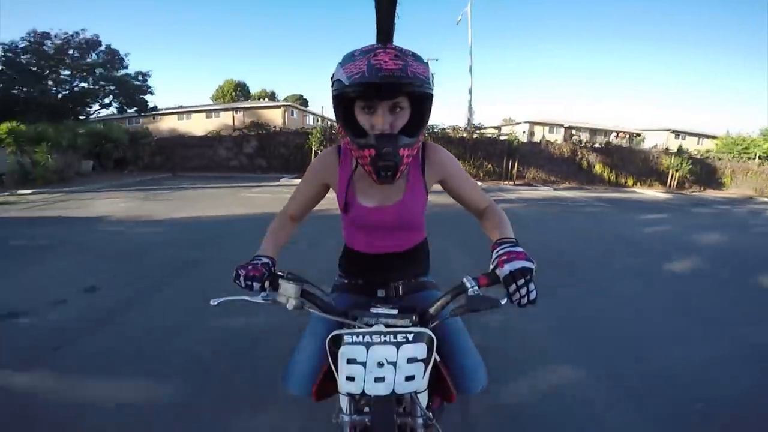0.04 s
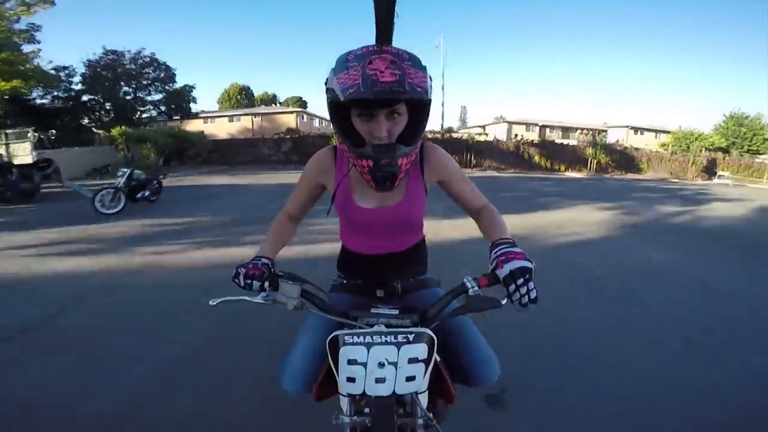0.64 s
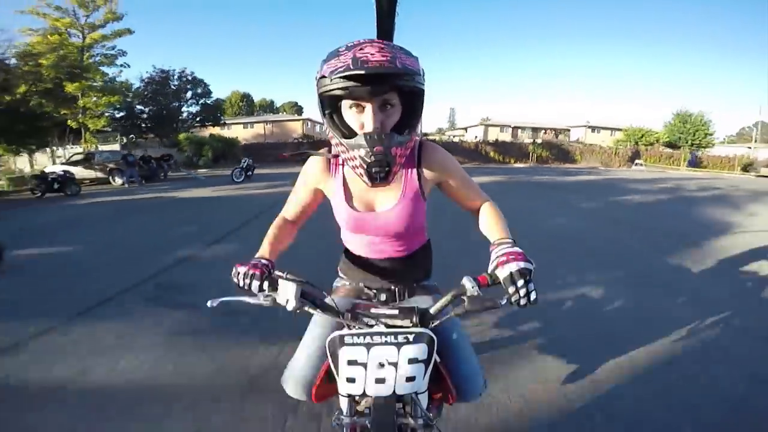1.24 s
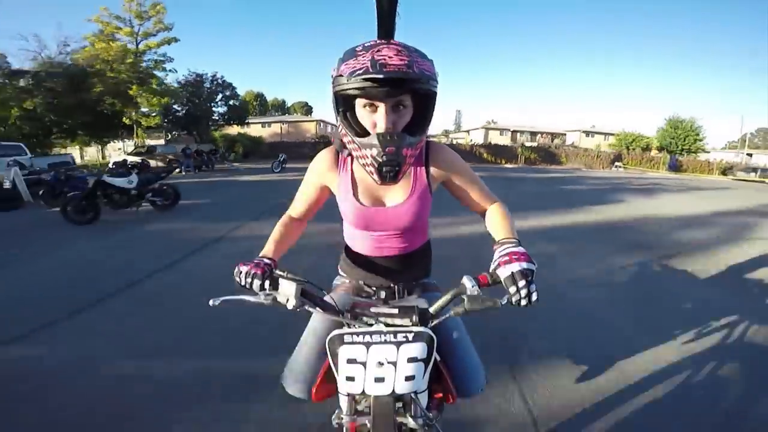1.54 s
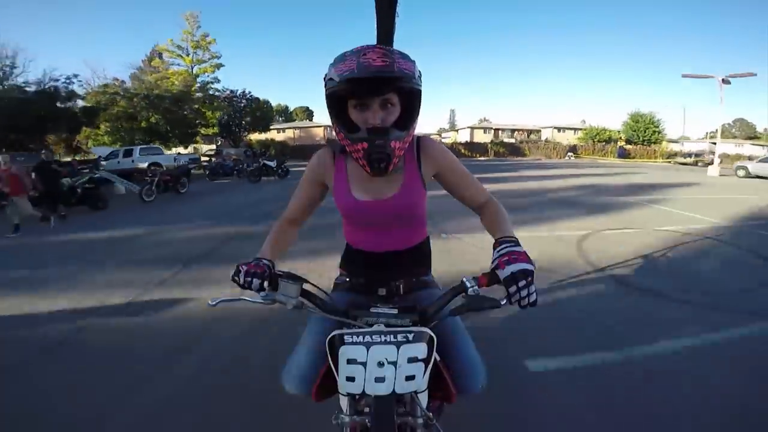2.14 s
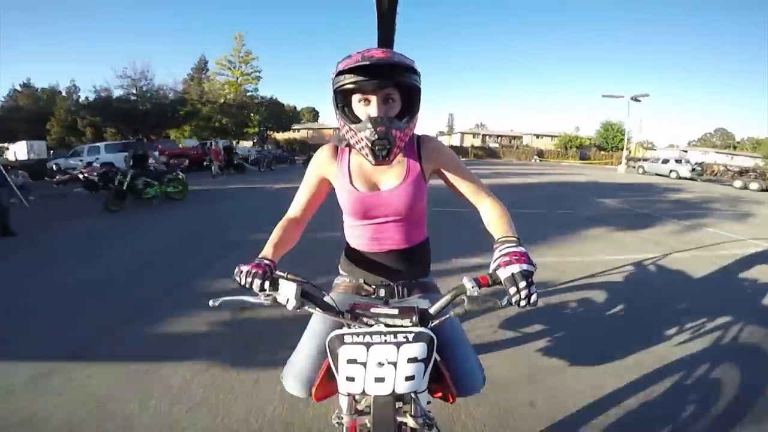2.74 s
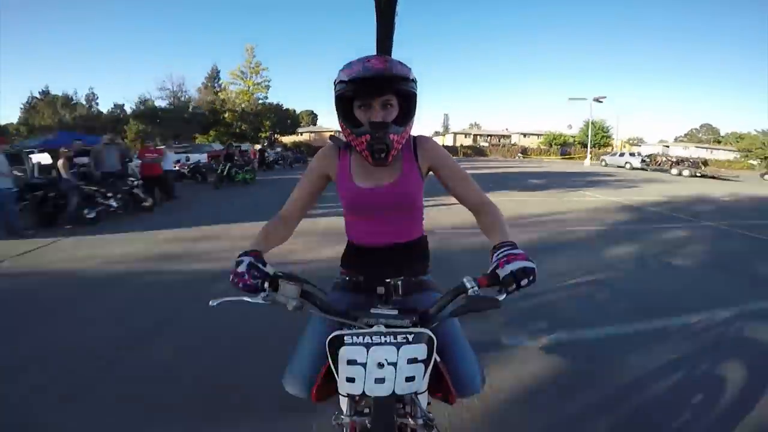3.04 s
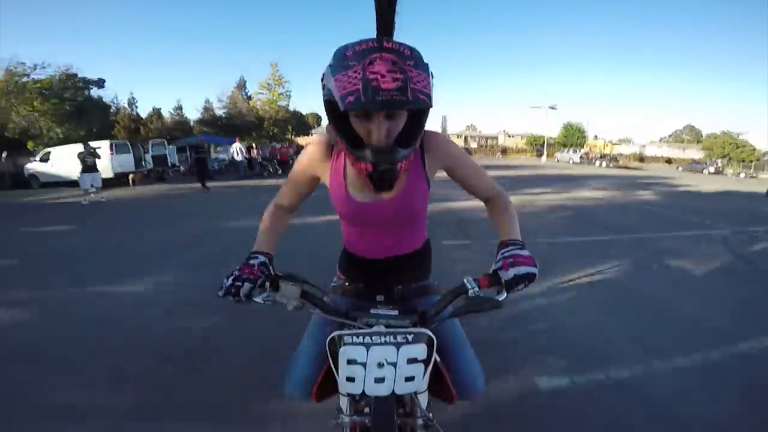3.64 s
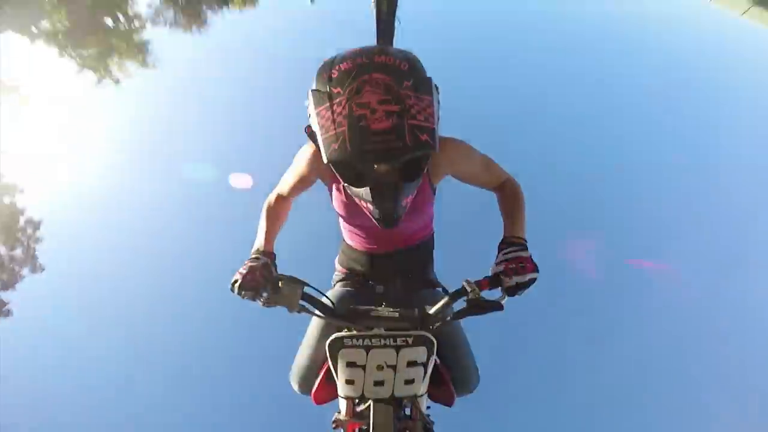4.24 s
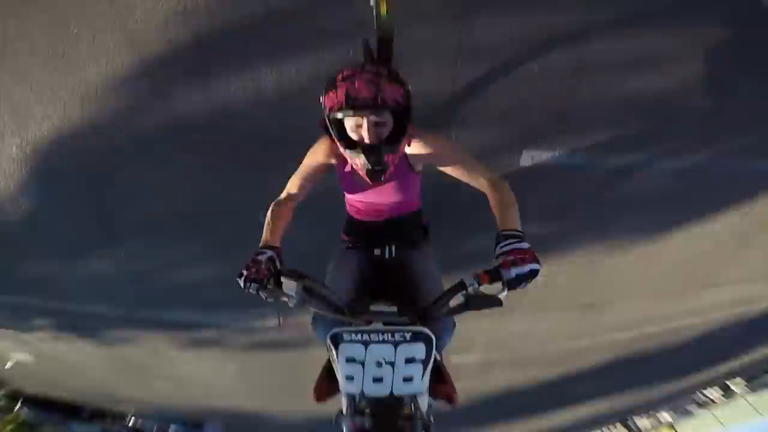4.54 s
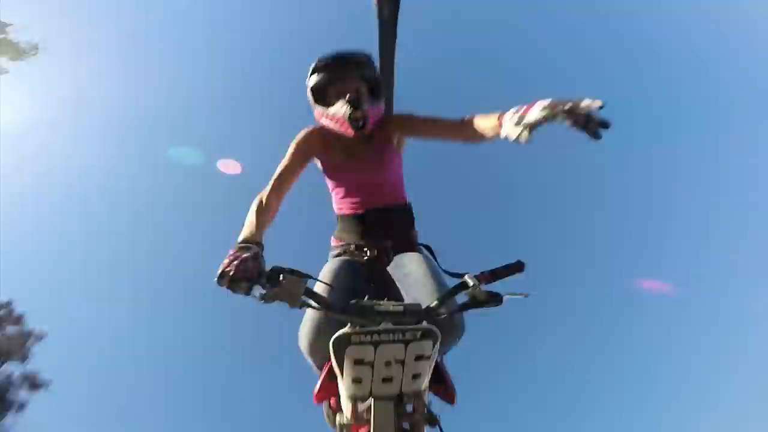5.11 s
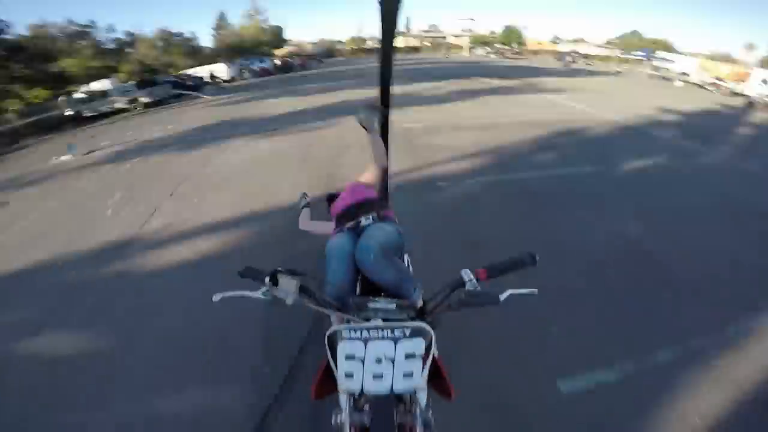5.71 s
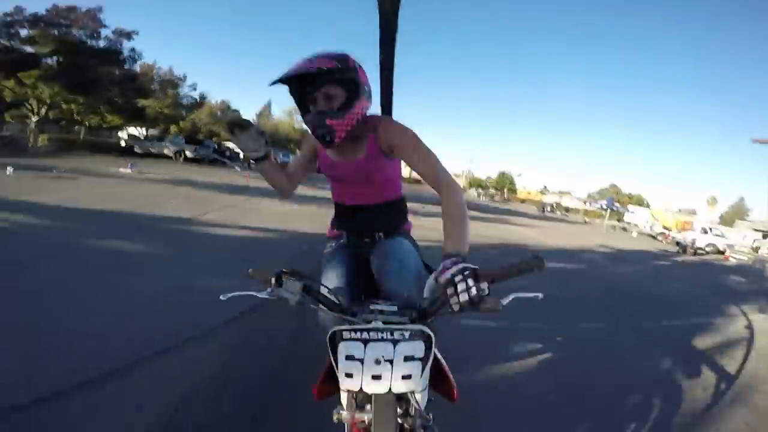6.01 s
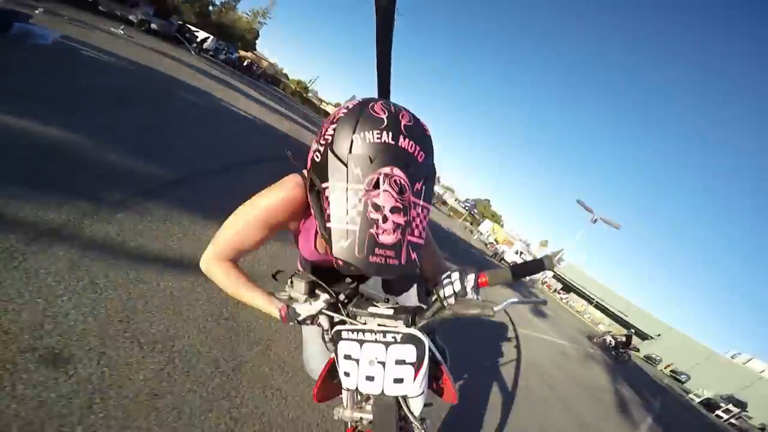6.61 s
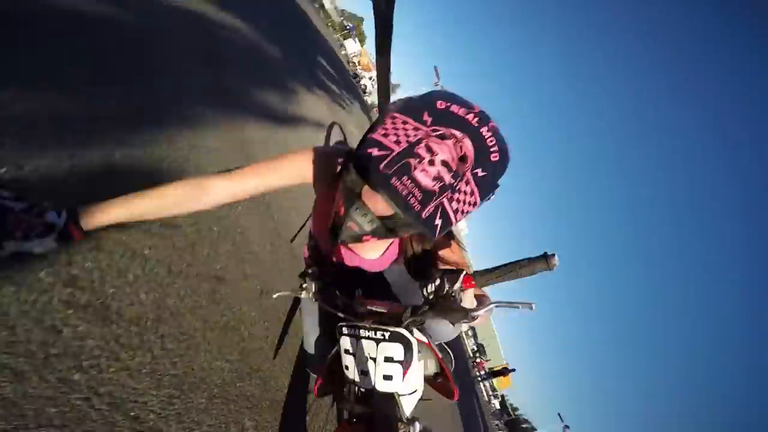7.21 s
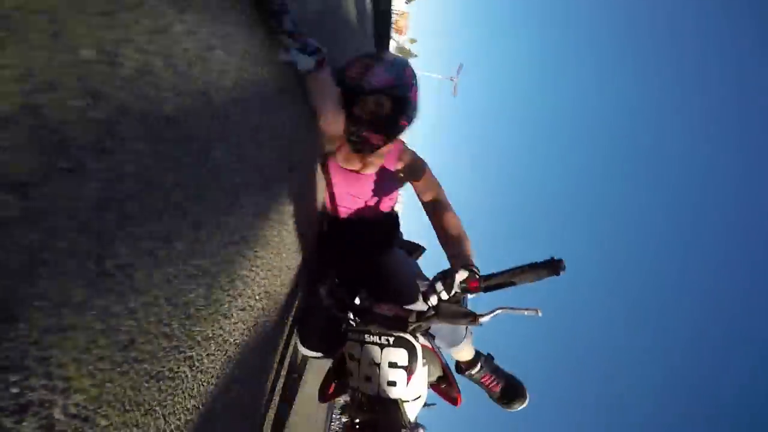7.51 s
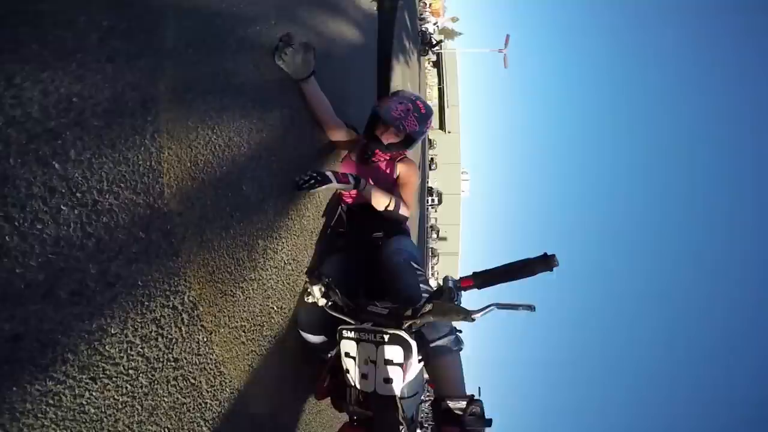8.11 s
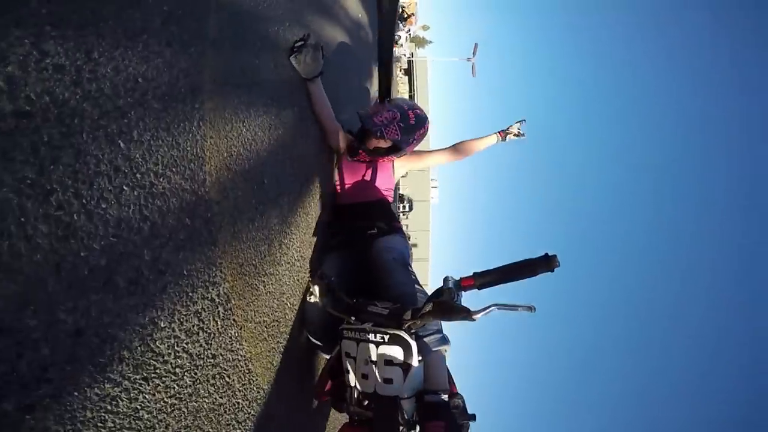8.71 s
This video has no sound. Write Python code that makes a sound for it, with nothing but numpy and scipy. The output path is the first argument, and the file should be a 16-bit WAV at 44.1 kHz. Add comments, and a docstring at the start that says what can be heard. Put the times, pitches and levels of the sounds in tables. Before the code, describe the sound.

A small dirt bike engine revs hard, then the bike tumbles over asphalt with cracks and clanks, scrapes along and idles.

```python
"""A small four-stroke dirt bike revs hard, heard from a camera on a pole bolted to its frame.
The throttle shuts; the bike flips and bounces over the asphalt in cracks, thuds and clanks of
loose metal, and each landing sets the pole swinging. It rolls on slowly, scrapes down on its
footpeg and handlebar, and idles. The engine is firing strokes and rattling parts over a road
rumble. Nearly all the sound comes up the pole and rings in the camera housing."""
import sys
import numpy as np
from scipy import signal
from scipy.fft import rfft, irfft, next_fast_len
from scipy.io import wavfile
from scipy.ndimage import uniform_filter1d, minimum_filter1d

SR = 44100
rng = np.random.default_rng(int(sys.argv[2]) if len(sys.argv) > 2 else 0)


def to_wav(s):
    """Save 16-bit WAV."""
    ch = np.atleast_2d(s).T  # columns
    pcm = np.round(np.clip(ch, -1, 1) * 32767)  # PCM
    wavfile.write(sys.argv[1], SR, pcm.astype(np.int16))


N = 394694
TIME = np.arange(N) / SR
HZ = np.fft.rfftfreq(8192, 1 / SR)

# The bike lands on the asphalt:
# start_s, crack_db, thud_relative_db, rebound_db, settle_s, swing_db, swing_hz, swing_t60_s
LANDINGS = [(4.4588, 8.5, -5.5, -13, 0.046, -7.5, 42.4, 0.3),
            (4.6312, -2, 0.5, -13.5, 0.083, -2, 40.65, 0.42),
            (5.046, 3, -1.5, -4, 0.072, -6.5, 41.25, 0.77), (5.524, 5, -2.5, -9, 0.12, -6, 39.86, 1),
            (5.921, -21, 10, -18.5, 0.072, -3.5, 38.3, 0.43), (7.657, -7, 4, -10, 0.023, -3, 69.26, 0.2)]
# Tone of a hard contact: frequency_hz, gain_db
CRACK_TONE = [(600, 10), (1200, 8), (2300, 9), (3500, -2.5), (4800, -9.5), (7500, -15.5), (12500, -29),
              (15000, -30)]
# Tone of a blow through the frame: frequency_hz, gain_db
THUD_TONE = [(47, -32), (80, 6.5), (136, -12), (233, -8), (413, -9.5), (762, -14), (1010, -13.5),
             (1350, -25), (1800, -27), (2340, -71), (3960, -120)]
# Tone of grit on the housing: frequency_hz, gain_db
GRIT_TONE = [(2500, -24), (5000, 7.5), (7000, -3.5), (9000, -6.5), (11000, 0), (13500, -2.5), (15000, -18)]

COASTING = np.clip((TIME - LANDINGS[0][0]) / 0.029 + .5, 0, 1)  # 0 under way, 1 after the first landing


def engine():
    """Firing strokes and loose parts ring through the housing as exhaust, whine and clatter."""
    # The throttle opens, eases, opens wide and shuts, with one blip in the tumble: time_s, turns_per_s
    crank_speed = [(0, 126), (.17, 118.6), (.5, 136), (.62, 135), (.77, 120.3), (.93, 110.5), (1.07, 120.4),
                   (1.37, 124.4), (1.97, 133.6), (2.42, 148), (3.05, 159.5), (3.17, 159), (3.5, 138.6),
                   (3.77, 124), (4.22, 90), (4.45, 90), (4.7, 46), (5.2, 45.5), (5.52, 69.4), (6.05, 43),
                   (6.95, 52.2), (8.35, 38.8), (8.95, 48)]
    # How loosely the engine rattles: time_s, roughness (0-1)
    looseness = [(0, 0.33), (1.6, 0.36), (2.4, 0.43), (3.1, 0.47), (3.45, 0.23), (3.85, 0.69), (4.5, 0.88),
                 (8.9, 0.86)]
    speed, rough = curves(crank_speed) + curves(looseness)
    exhaust_db, clatter_db = engine_levels(speed)
    angle = 2 * np.pi * np.cumsum(speed * (1 + 0.00715 * rough * drift(23.76))) / SR
    shake = crank_shake(angle)
    firing, singing = map(housing, firing_strokes(angle))
    rattle = housing(engine_rattle(angle))

    def blend(rattle_share, lo_hz, hi_hz):
        """Mixes firing and rattle, each levelled by its rms in a band; singing orders ride on top."""
        tone = (firing + singing) / running_rms(band(firing, lo_hz, hi_hz), size=14000)
        noise = rattle / running_rms(band(rattle, lo_hz, hi_hz))
        return np.sqrt(1 - rattle_share) * tone + np.sqrt(rattle_share) * noise

    exhaust = amp(exhaust_db) * band(blend(rough ** 2, 330, 900), 130, 860, order=4)
    whine = amp(clatter_db - 2 - 1.94 * COASTING) * band(blend(rough, 900, 1081), 803, 1600, order=4)
    clatter = amp(clatter_db + .5) * band(blend(np.sqrt(rough), 1900, 3400), 1710, 12000, order=4)
    fizz = signal.sosfiltfilt(signal.butter(4, 6600, "high", fs=SR, output="sos"), clatter)
    clatter -= COASTING * (1 - amp(-1.5)) * fizz  # a slow engine rattles with less fizz
    low_end = shake + pole_drone(angle) + road_rumble(angle)
    return exhaust + whine + clatter + low_end + idle_puffs(angle, exhaust_db)


def engine_levels(speed, cruise_turns_per_s=126):
    """Exhaust and clatter levels in dB: under way they climb with the revs, then they drop to idle."""
    # The idle, louder as the bike leans over: time_s, exhaust_db, clatter_db
    idle_levels = [(4.5, -48, -43.5), (5.35, -48, -45.5), (6.4, -46, -40), (7.3, -42, -32.5),
                   (8.25, -42.5, -40), (8.95, -40, -32)]
    idle_exhaust_db, idle_clatter_db = curves(idle_levels)
    revs = speed - cruise_turns_per_s
    surge_db = 0.22 * drift(5)  # the load wavers
    exhaust_db = (1 - COASTING) * (-29 + 0.1659 * revs) + COASTING * idle_exhaust_db
    clatter_db = (1 - COASTING) * (-27.5 + 0.2045 * revs) + COASTING * idle_clatter_db
    return exhaust_db + surge_db, clatter_db + surge_db


def firing_strokes(angle):
    """Firing every second turn gives whole and weaker half orders; returns the buzz and singing orders."""
    # Orders that stand out or sink: crank_multiple, gain_db
    voicing = [(2, -1), (2.5, 0), (3, -1), (3.5, 9), (4, 0.5), (4.5, 7.5), (5, -3), (6, -3), (7, -4),
               (8, -7), (9, -2), (10, -3)]
    # Orders that sing as they sweep through a frame resonance:
    # centre_s, half_length_s, crank_multiple, gain_db
    swells = [(3.45, 0.44, 2, 3.5), (3.1, 0.2, 4, -10), (3.32, 0.087, 7, 6), (3.49, .11, 8, 11.5)]
    half_order = np.arange(2049)
    orders = (half_order > 2) * amp(-7 * (half_order % 2)) / (1 + (half_order / 60) ** 2)
    for multiple, db in voicing:
        orders[round(2 * multiple)] *= amp(db)
    orders = orders * np.exp(2j * np.pi * rng.random(len(orders)))

    def looped(partials):
        """One two-turn cycle, repeated at the speed of the crank."""
        cycle = irfft(partials)
        return np.interp(angle / (4 * np.pi) % 1, np.linspace(0, 1, len(cycle)), cycle)

    singing = np.zeros(N)
    for centre_s, half_length_s, multiple, db in swells:
        swell = amp(db) * np.exp(-((TIME - centre_s) / half_length_s) ** 4)
        singing += swell * looped(orders * (half_order == 2 * multiple))
    waver = sum(drift(2.1) * looped(orders * rng.standard_normal(len(orders))) for _ in range(2))
    return looped(orders) + 0.62 * waver, singing


def engine_rattle(angle):
    """Loose parts rattle hardest once a turn, and no two turns are alike."""
    knocks = .5 + 0.18 * COASTING + np.exp(-(angle / (2 * np.pi) % 1) / 1.1)
    flicker = amp(2 * drift(150) + 0.84 * drift(10))
    return unit(knocks * flicker * rng.standard_normal(N))


def crank_shake(angle):
    """The crank shakes the pole once a turn: a deep hum with a faint octave below."""
    # Strength of the shake: time_s, level_db
    shake_levels = [(0, -10.5), (.41, -8.5), (.48, -20.5), (.66, -7.5), (.98, -20.5), (1.1, -11),
                    (1.78, -8.5), (2.45, -22.5), (3.33, -14), (3.5, -7.5), (3.82, -10.5), (3.95, -20.5),
                    (4.44, -13.5), (4.6, -31.5), (5.5, -18), (6.1, -25), (6.7, -13), (7.4, -13),
                    (8.2, -25.5)]
    gain = np.sqrt(2) * amp(curves(shake_levels)[0] + .5 * drift(25))
    return gain * (np.sin(angle) + amp(-31.5) * np.sin(angle / 2))


def idle_puffs(angle, exhaust_db, decay_cycles=0.099):
    """At idle the firing strokes stand apart: one soft puff every second turn."""
    stroke = np.exp(-(angle / (4 * np.pi) % 1) / decay_cycles)
    puffs = band(stroke * (2 + rng.standard_normal(N)), 198, 400, order=2)
    return COASTING * amp(exhaust_db - 7) * unit(puffs)


def housing(x):
    """Engine vibration travels up the pole and rings in the camera housing."""
    # Path from the frame to the microphone: frequency_hz, gain_db
    frame_path = [(60, -61), (150, -11), (260, -2), (400, -8.5), (520, -19), (900, -19.5), (1300, -8.5),
                  (1800, -14), (3150, -15), (3500, -24.5), (5600, -36), (7600, -34.5), (8400, -48),
                  (11500, -42), (15000, -66.5)]
    # Resonances and notches of the housing: centre_hz, width_hz, gain_db
    modes = [(457.3, 4.6, 16), (631.2, 43, 16.5), (766.5, 200, 12), (1037, 107, 20), (1125, 88, 13.5),
             (1437, 117, -16.5), (2011, 50, 10), (2226, 346, 16), (2843, 62, 8), (3033, 34, 8),
             (4040, 64, 8), (4550, 110, 6), (5010, 5.7, 18), (5570, 110, 10.5), (5850, 160, -18.5),
             (6810, 51, 13), (7240, 320, 7.5)]
    modes_db = sum(db / (1 + (2 * (HZ - hz) / width) ** 2) for hz, width, db in modes)
    return colour(x, spectrum(frame_path) + modes_db)


def blows():
    """Each contact is a short, crunchy crack and a longer thud through the frame; the hardest snap."""
    # Bright edge of a hard blow: frequency_hz, gain_db
    snap_tone = [(2500, -18), (4200, 7.5), (6000, -5), (9500, -9), (12500, -13), (15000, -26)]
    t = np.arange(SR // 4) / SR
    cracks, thuds, snaps = np.zeros((3, N))
    for s, db, thud_db in contacts():
        crunch = burst(t, 0.13) * sparse(len(t), per_s=200)
        add(cracks, s, amp(db - 10) * (burst(t, 0.027) + amp(2) * crunch))
        add(thuds, s, amp(db + thud_db - 2) * burst(t, 0.061))
        add(snaps, s, amp(2.03 * db - 25.5) * burst(t, 0.017))  # treble grows faster than the blow
    return voiced(cracks, CRACK_TONE) + voiced(thuds, THUD_TONE) + voiced(snaps, snap_tone)


def contacts():
    """Two hits a landing, then knocks at both ends of the pole's swing: start_s, crack_db, thud_db."""
    for s, db, thud_db, rebound_db, settle_s, _, swing_hz, _ in LANDINGS:
        yield s, db, thud_db
        yield s + 0.0099, db - 5.5, thud_db
        for half_swing in range(2, 11):
            delay_s = half_swing / (2 * swing_hz)
            jitter_s = .003 * rng.standard_normal()
            fade_db = -10 * min(delay_s / settle_s, 2) ** 4
            backswing_db = -11 * (half_swing % 2)
            yield s + delay_s + jitter_s, rebound_db + fade_db + backswing_db, 0.5


def pole_swings(lag_s=.01):
    """Each landing whips the pole into its lowest mode, with a brief overtone."""
    t, out = np.arange(SR) / SR, np.zeros(N)
    for s, *_, db, hz, t60 in LANDINGS:
        phase = 2 * np.pi * hz * t
        swing = np.sin(phase) + 0.52 * amp(-25 * t / t60) * np.sin(2.9 * phase)
        add(out, s + lag_s, amp(db - 60 * t / t60) * swing)
    return out


def clanks():
    """Loose metal chatters on the frame: light touches ring, heavy ones stay pressed and sound dry."""
    # Levers, pegs and chain strike: start_s, level_db, body_relative_db, pitch_ratio
    strikes = [(3.769, -10.5, -3, 1.053), (4.7313, -15.5, 8.5, 1.15), (4.792, -16.5, 6.5, 1),
               (4.9818, -11, 2.5, 1), (5.142, -16, 1, 1.01), (5.9374, -9.5, 0.5, 1.02),
               (5.9897, -13, -1.5, 1), (6.0152, -13.5, -3, 1.24), (6.1732, -6, -3, 0.98),
               (6.8741, -16, -10, 0.98), (7.216, -11, 2, 1), (7.39, -2, -9.5, 1), (7.52, -9, -5.5, 0.93),
               (7.63, -11, -16.5, 1.01), (7.7212, -13, -8, 1), (8.027, -11.5, -1.5, 0.94),
               (8.097, -16, -13, 1), (8.1798, -21.5, -21, 1)]
    t = np.arange(SR // 6) / SR
    rings, ticks, knocks = np.zeros((3, N))
    for s, db, body_db, pitch in strikes + list(after_rattles()):
        chatter = burst(t, 0.14) * sparse(len(t), per_s=882)
        chatter[0] = 3  # the first touch
        ring = signal.fftconvolve(chatter, metal_ring(t, pitch))[:len(t)]
        add(rings, s, amp(db - 4.5 - 0.53 * body_db) * ring / abs(ring).max())
        add(ticks, s, amp(db - 7 + .3 * body_db) * burst(t, 0.16) * sparse(len(t), per_s=2646))
        add(knocks, s, amp(db + body_db - 10) * burst(t, 0.16))
    clicks = band(voiced(ticks, CRACK_TONE), 600, 5000, order=1)
    bright_edge = amp(-18.5) * voiced(ticks, GRIT_TONE)
    return rings + clicks + bright_edge + voiced(knocks, THUD_TONE)


def metal_ring(t, pitch, contact_s=0.00029):
    """Each resonance is a cluster of three close modes; a soft contact lets the ring swell in."""
    # Resonances of the loose metal: pitch_hz, level_db, t60_s
    modes = [(1600, -7, .05), (2057, 10.5, 0.11), (2195, 18.5, 0.051), (2620, -14, .05), (2830, 1, .06),
             (3100, -9, .05), (4493, -15, .03), (5530, -7.5, 0.059), (6170, -8, .03)]
    ring = np.zeros(len(t))
    for hz, db, t60 in modes:
        for _ in range(3):
            decay = amp(db + 2.76 * rng.standard_normal() - 60 * t / t60)
            detuned_hz = pitch * hz * (1 + 0.0254 * rng.standard_normal())
            ring += decay * np.sin(2 * np.pi * detuned_hz * t)
    return ring * (1 - np.exp(-t / contact_s))


def after_rattles(per_s=20):
    """Loose parts go on rattling: light, uneven strikes for clanks()."""
    # Spells of rattling: start_s, end_s, level_db, body_relative_db
    spells = [(4.692, 4.86, -25.5, -2), (5.14, 5.23, -22.5, 5), (6.259, 6.361, -18, -2.5),
              (7.78, 7.86, -14, -4.5), (8.199, 8.42, -32, -27.5)]
    for start_s, end_s, db, body_db in spells:
        for s in np.arange(start_s, end_s, 1 / per_s):
            yield s + .5 * rng.random() / per_s, db - 2 * rng.standard_normal(), body_db, 1


def slide():
    """Footpeg and then handlebar catch on the grit in uneven slips; a few stones are large."""
    # The bike slides on its side: time_s, grind_db, drag_db, weight_on_bar (0-1)
    moves = [(7.205, -19.5, -46, 0.11), (7.229, -14.5, -19, 0.03), (7.3, -15, -17.5, 0),
             (7.375, -15.5, -17, 0.1), (7.4, -19.5, -11, 0.86), (7.49, -17, -16.5, 0.8),
             (7.551, -26, -34, 0.92), (7.649, -31, -39, 0.96)]
    # Tone of the grinding footpeg: frequency_hz, gain_db
    peg_tone = [(600, -14), (900, -34), (1050, 7.5), (1300, -12), (1700, -12), (2200, 4.5), (2650, -11.5),
                (3250, -1.5), (3650, -23.5), (5500, -29), (8000, -42), (13300, -47), (15000, -63)]
    # Tone of the grinding bar end: frequency_hz, gain_db
    bar_tone = [(500, -18), (1050, -18), (1500, 0), (1900, -16), (2080, 15.5), (2250, 11), (2600, -2),
                (3400, -16), (3800, -53), (5700, -23), (8000, -50), (15000, -77)]
    # Low drag of the bike: frequency_hz, gain_db
    drag_tone = [(30, -21), (60, 2.5), (130, 3), (200, -11), (350, -9), (520, -14.5), (1000, -13),
                 (1500, -58)]
    grind_db, drag_db, on_bar = curves(moves)
    contact = np.clip(np.minimum(TIME - moves[0][0], moves[-1][0] - TIME) / 0.015, 0, 1)
    stones = 2.55 * sparse(N, per_s=60) * rng.choice([-1, 1], N)
    grit = stones + rng.standard_normal(N) * sparse(N, per_s=3500) * amp(2 * drift(47))
    peg, bar, drag = (unit(colour(grit, spectrum(tone))) for tone in (peg_tone, bar_tone, drag_tone))
    metal = np.sqrt(1 - on_bar) * peg + np.sqrt(on_bar) * bar
    return contact * (amp(grind_db) * metal + amp(drag_db) * drag)


def pole_drone(angle, mode_hz=130.6, width_hz=5.3):
    """At low speed the engine's third order meets a bending mode of the pole."""
    orders = np.sin(3 * angle) + .5 * np.sin(1.9 * angle) + .5 * np.sin(2 * angle)
    orders += 0.13 * np.sin(4 * angle)
    putter = amp(2.7 * drift(33)) * orders + 14.6 * rng.standard_normal(N)
    drone = band(putter, mode_hz - width_hz / 2, mode_hz + width_hz / 2, order=1)
    return COASTING * amp(-21.5) * band(drone, 84, 253, order=2)


def road_rumble(angle):
    """The road shakes the whole bike; under way the firing and the geared-down drive wobble it too."""
    # Strength of the rumble: time_s, level_db
    road_levels = [(0, -27.5), (1.85, -30.5), (2.45, -15.5), (3.15, -16), (3.7, -32), (3.92, -17),
                   (4.4, -20.5), (4.6, -25.5)]
    # Tone of the rumble: frequency_hz, gain_db
    road_tone = [(12, -10), (28, 2.5), (42, 8), (70, -5), (110, -1.5), (200, -12.5), (400, -68.5)]
    road = unit(colour(rng.standard_normal(N), spectrum(road_tone)))
    sprocket = np.sin(angle * 2 / 7)
    wobble = np.interp(TIME, [3.4, 3.9], [1, .3]) * (0.51 * sprocket + 1.2 * np.sin(angle / 2))
    driven = 1.07 * road + wobble
    driven /= running_rms(driven, size=16000)
    return amp(curves(road_levels)[0]) * ((1 - COASTING) * driven + COASTING * road)


def flung_grit(per_s=22, lasts_s=.36):
    """After each landing, flung grit ticks ever more faintly against the housing."""
    t, ticks = np.arange(SR // 50) / SR, np.zeros(N)
    for s, *_ in LANDINGS:
        for delay_s in np.arange(0, lasts_s, 1 / per_s):
            start_s = s + delay_s + rng.random() / per_s
            db = -50.5 - 41 * delay_s + 6.5 * rng.standard_normal()
            add(ticks, start_s, amp(db) * burst(t, 0.017))
    return voiced(ticks, GRIT_TONE)


def amp(db):
    """Decibels to gain."""
    return 10 ** (np.asarray(db) / 20)


def unit(x):
    """Scales to rms 1."""
    return x / np.sqrt(np.mean(x ** 2) + 1e-20)


def curves(rows):
    """Each column after time_s, joined by straight lines in time."""
    s, *columns = np.transpose(rows)
    return [np.interp(TIME, s, c) for c in columns]


def spectrum(tone):
    """An EQ curve in dB, joined on a log-frequency axis."""
    hz, db = np.transpose(tone)
    return np.interp(np.log(HZ + 1), np.log(hz + 1), db)


def colour(x, db):
    """Minimum-phase filter with the given EQ curve."""
    log_gain = np.log(amp(np.maximum(np.r_[db, db[-2:0:-1]], -100)))
    taps = np.fft.ifft(np.exp(np.conj(signal.hilbert(log_gain)))).real[:len(db)]
    return signal.oaconvolve(x, taps)[:len(x)]


def voiced(x, tone):
    """Colours white noise and keeps its power."""
    db = spectrum(tone)
    return colour(x, db - 10 * np.log10(np.mean(amp(db) ** 2)))


def band(x, lo_hz, hi_hz, order=3):
    """Band-pass."""
    return signal.sosfilt(signal.butter(order, [lo_hz, hi_hz], "band", fs=SR, output="sos"), x)


def running_rms(x, size=6000):
    """Level follower, smoothed twice over size samples."""
    return np.sqrt(abs(uniform_filter1d(uniform_filter1d(x ** 2, size), size)) + 1e-14)


def drift(hz):
    """Random wander of rms 1, rolling off above hz."""
    size = next_fast_len(N, True)
    rolloff = np.exp(-(np.fft.rfftfreq(size, 1 / SR) / hz) ** 2)
    return unit(irfft(rfft(rng.standard_normal(size)) * rolloff, size)[:N])


def burst(t, t60):
    """A puff of noise that dies away."""
    return rng.standard_normal(len(t)) * amp(-60 * t / t60)


def sparse(size, per_s):
    """Randomly scattered one-sample clicks."""
    return rng.random(size) < per_s / SR


def add(mix, s, sound):
    """Mixes a sound in at s seconds."""
    part = mix[round(s * SR):][:len(sound)]
    part += sound[:len(part)]


def scene():
    """Engine and crash, all at one microphone."""
    return (engine() + blows() + flung_grit() + clanks() + pole_swings() + slide())[None]


def record(dry):
    """A fast limiter catches the hardest blows, whose peaks still overload; then the top is cut off."""
    gain = minimum_filter1d(1 / np.maximum(abs(dry) / 1.5, 1), 24)
    limited = dry * uniform_filter1d(gain, 24)
    clipped = limited / (1 + (limited / .92) ** 8) ** (1 / 8)
    lowpass = signal.firwin(511, 15600, window=("kaiser", 9), fs=SR)
    return signal.oaconvolve(clipped, lowpass[None], "same")


dry = scene()
out = record(dry)
to_wav(out)
```